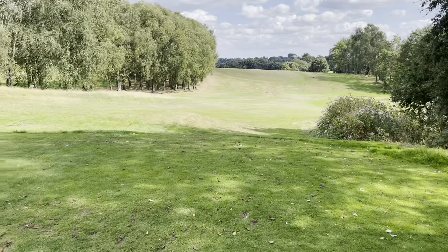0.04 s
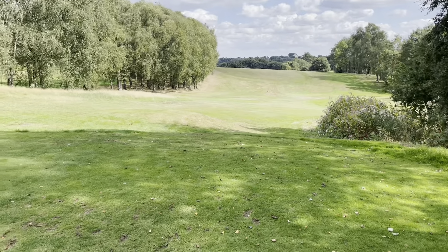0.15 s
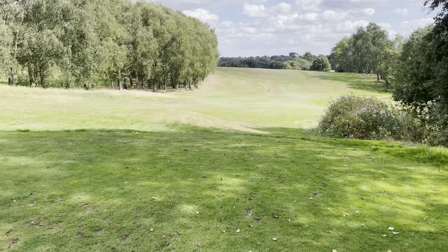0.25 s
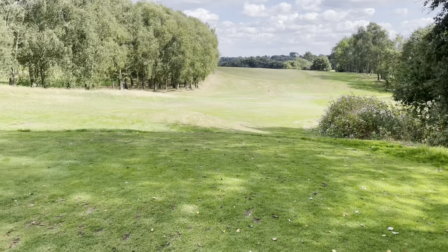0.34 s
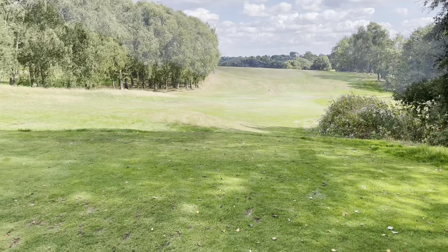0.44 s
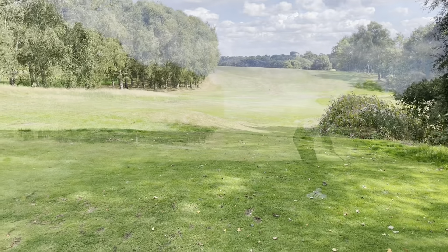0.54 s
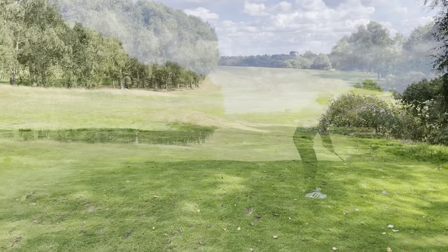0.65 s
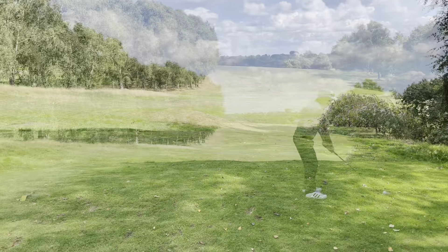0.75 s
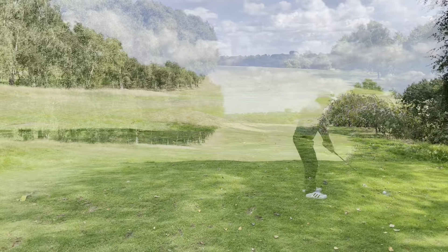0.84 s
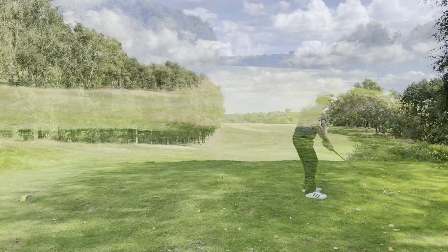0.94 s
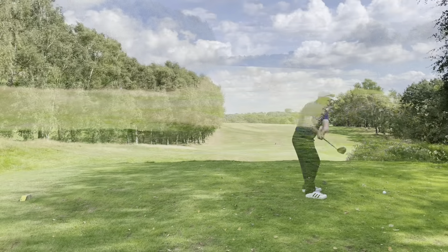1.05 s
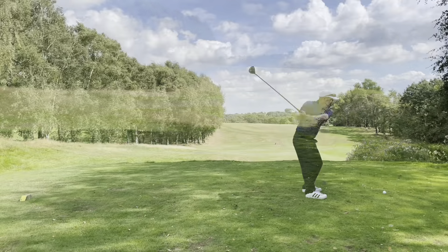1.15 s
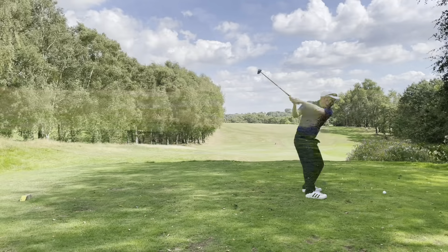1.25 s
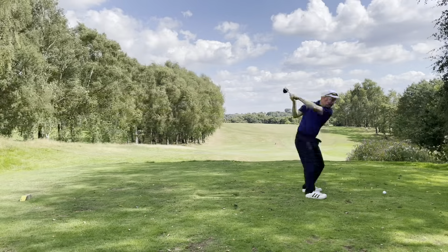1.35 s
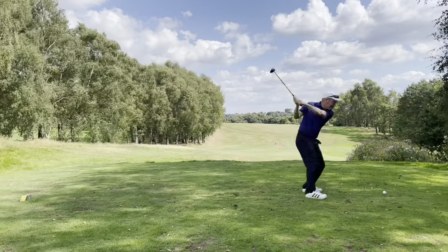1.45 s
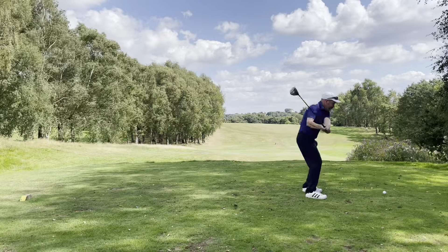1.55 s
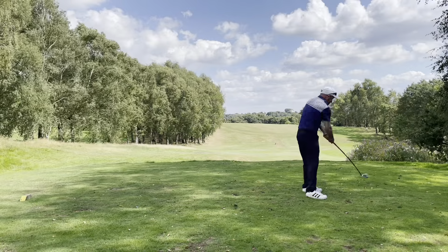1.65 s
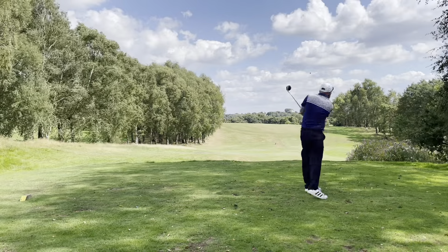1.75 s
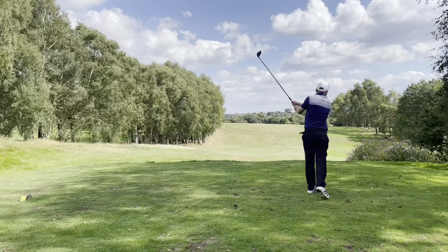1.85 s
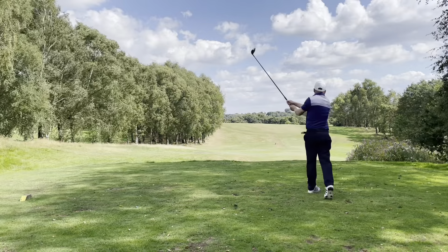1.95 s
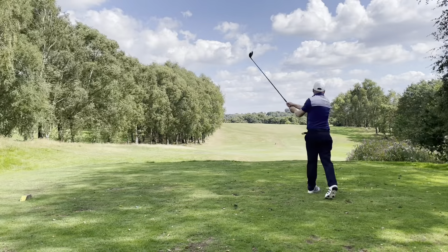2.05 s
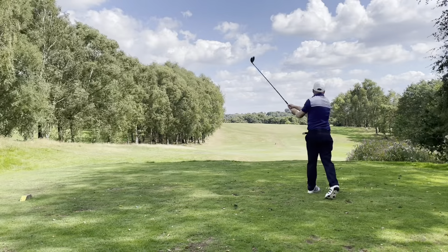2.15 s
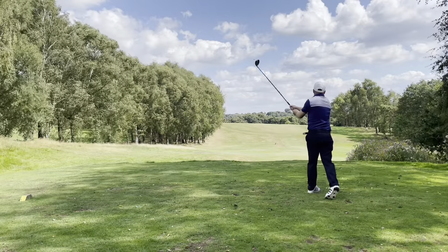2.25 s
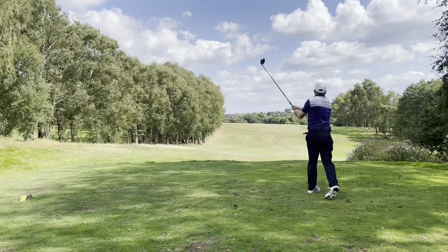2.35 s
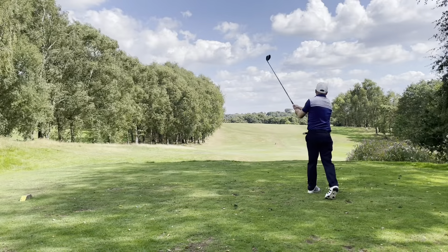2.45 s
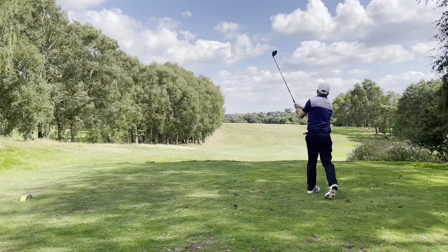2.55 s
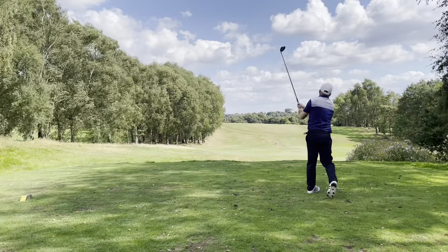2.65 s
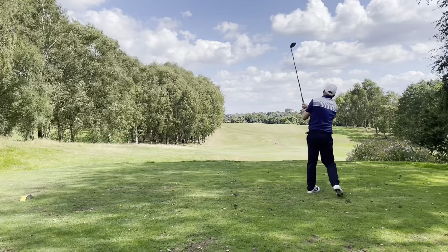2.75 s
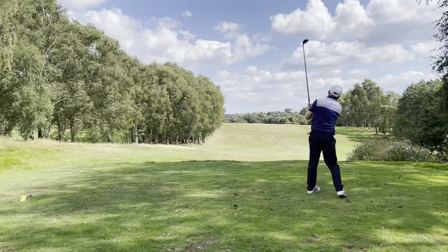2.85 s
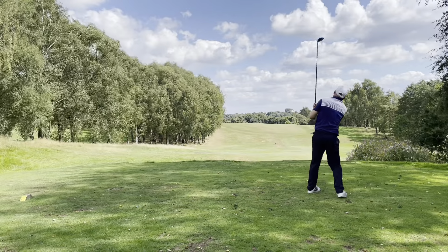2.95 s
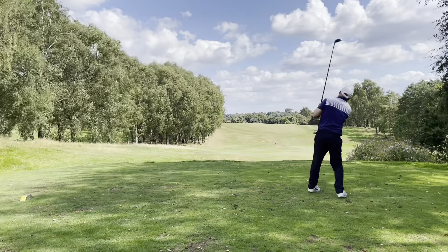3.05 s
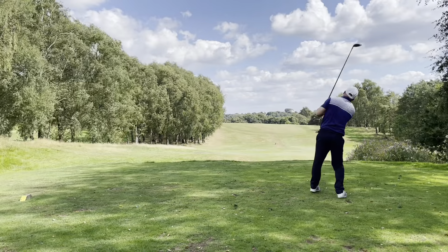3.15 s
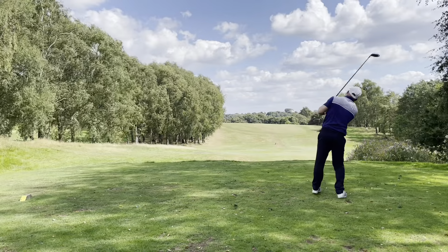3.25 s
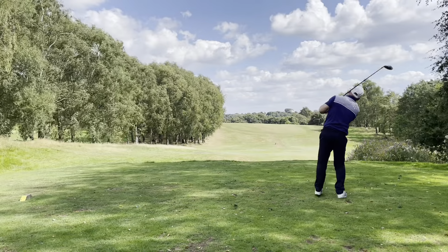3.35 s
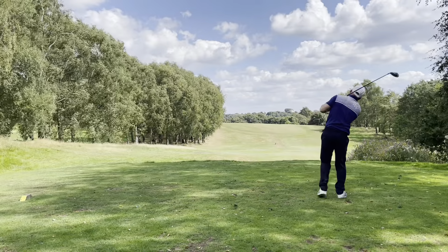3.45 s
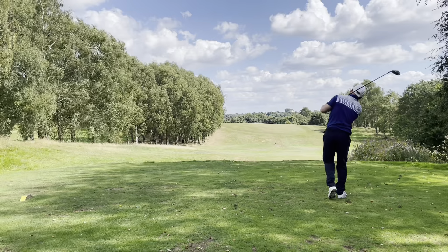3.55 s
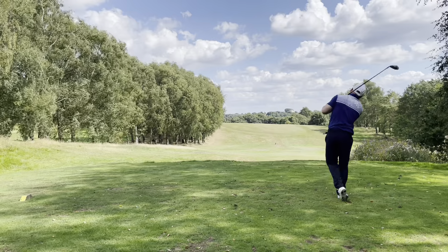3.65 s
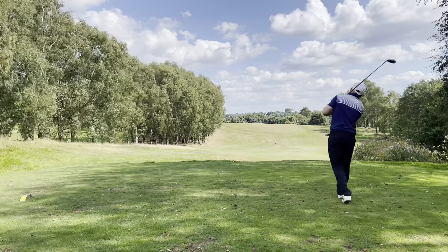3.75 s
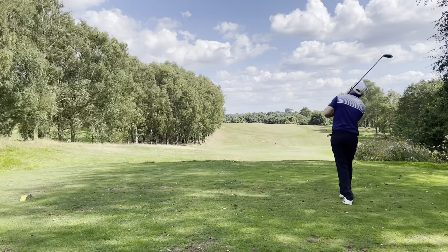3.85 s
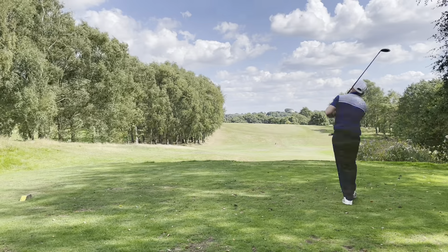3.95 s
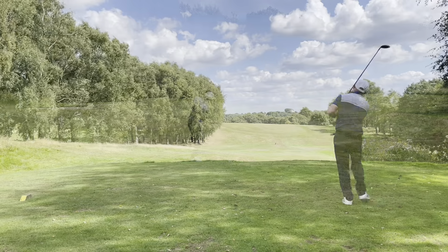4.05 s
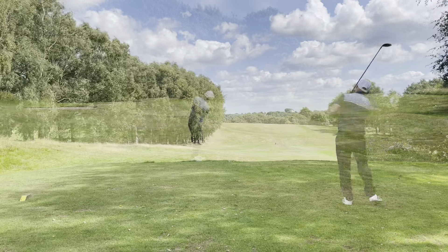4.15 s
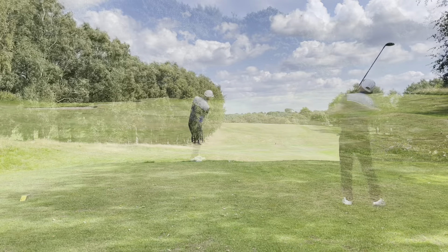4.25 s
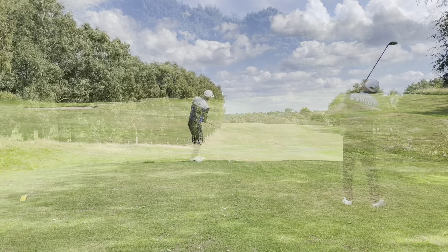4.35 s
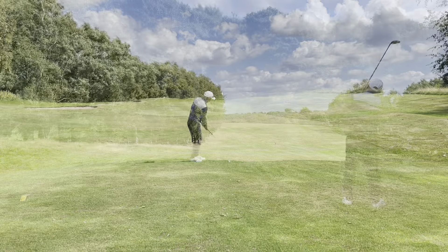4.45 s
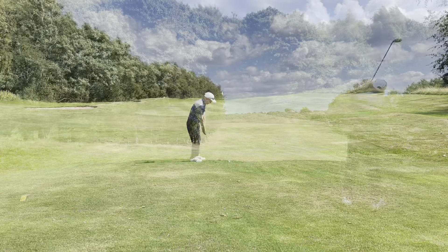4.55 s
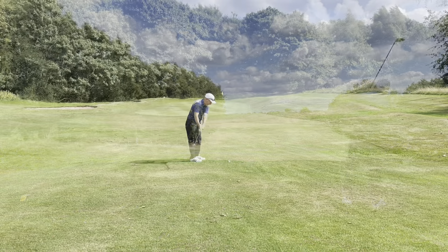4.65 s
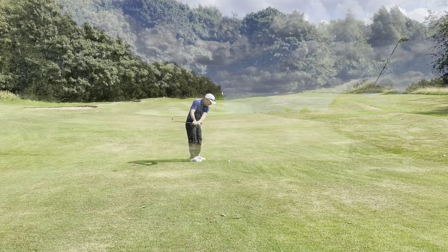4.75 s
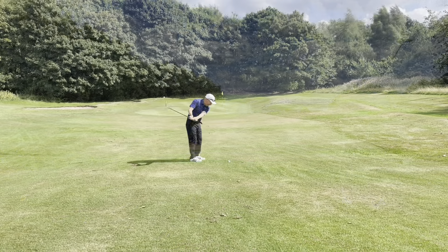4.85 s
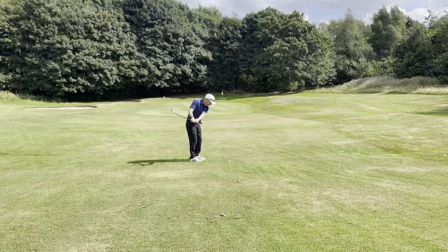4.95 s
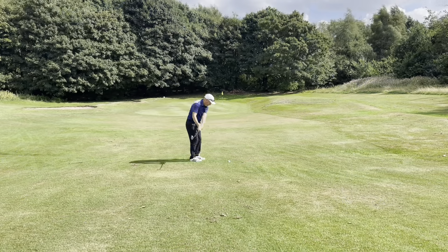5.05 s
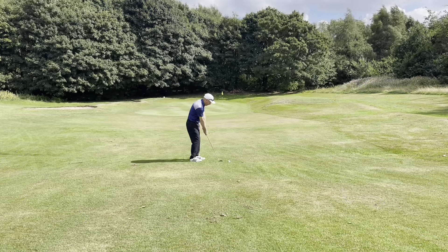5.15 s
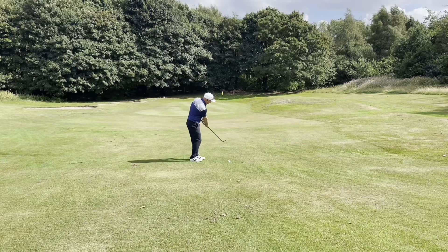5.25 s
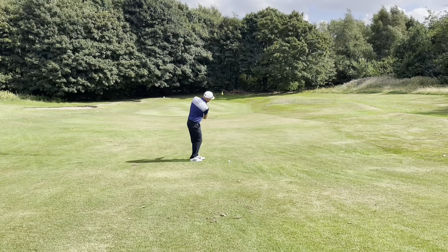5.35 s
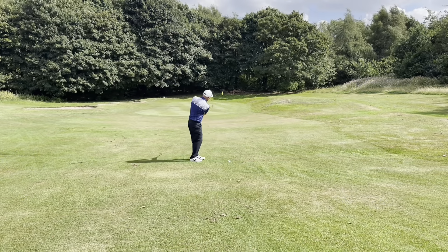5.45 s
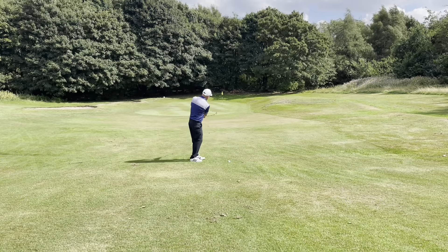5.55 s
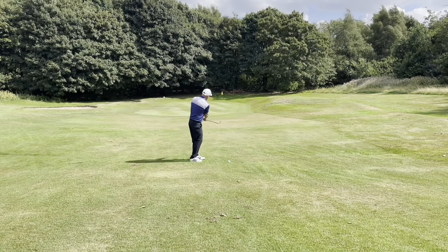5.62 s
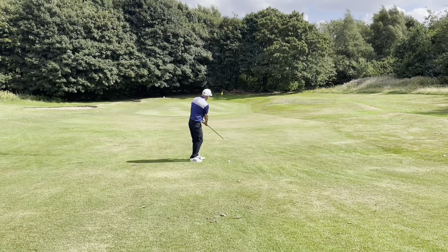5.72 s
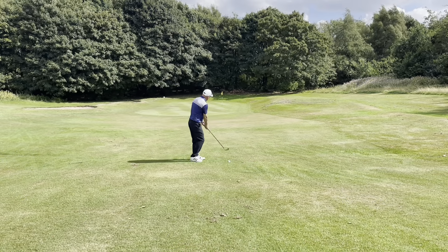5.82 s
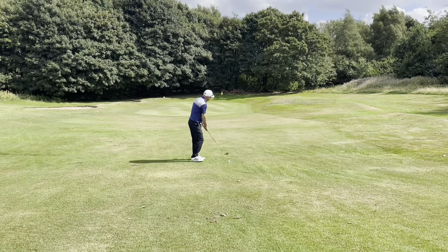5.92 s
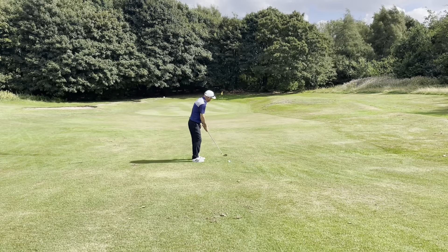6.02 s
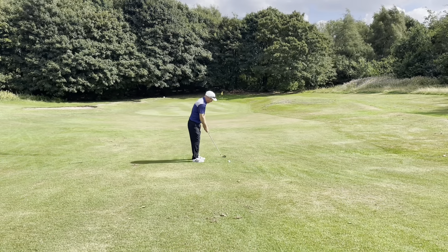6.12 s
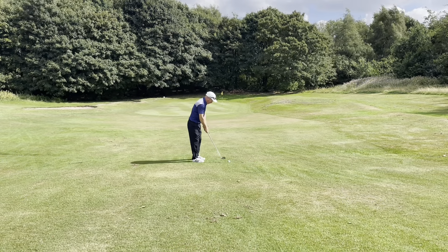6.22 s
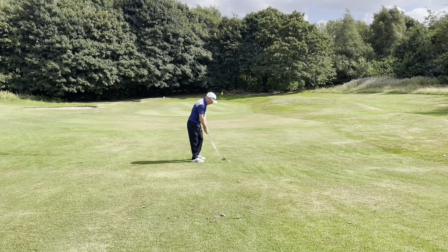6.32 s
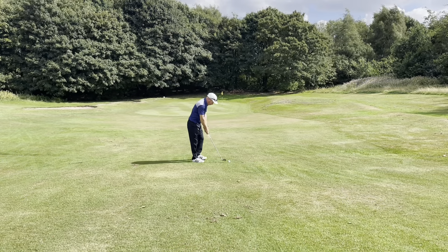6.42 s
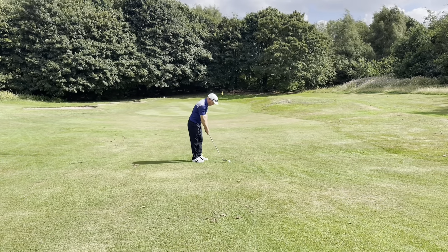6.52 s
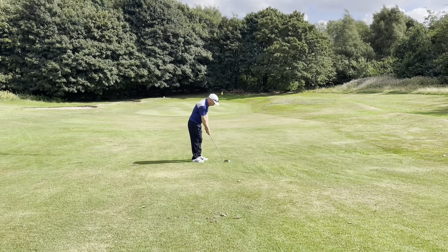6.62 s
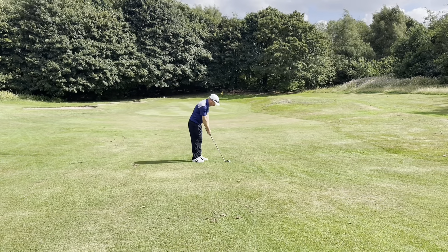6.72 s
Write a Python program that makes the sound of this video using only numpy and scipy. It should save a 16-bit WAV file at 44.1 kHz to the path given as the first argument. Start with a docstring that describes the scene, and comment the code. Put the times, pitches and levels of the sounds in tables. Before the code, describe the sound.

A sharp, pinging golf drive outdoors, followed by growing wind thumps on the microphone and a soft, distant club brushing grass.

```python
"""A driver cracks a golf ball off the tee: the hollow head rings, and trees hissing in the breeze throw
the crack back. The air then fades to an open fairway, where gusts buffet the microphone and a distant
short iron brushes through the turf. Two close microphone ports colour the stereo picture, and gain
control ducks the background after the crack."""
import sys
import numpy as np
from scipy import signal
from scipy.fft import rfft, irfft
from scipy.io import wavfile
from scipy.ndimage import uniform_filter1d

SR = 44100
rng = np.random.default_rng(int(sys.argv[2]) if len(sys.argv) > 2 else 0)


def persist_wave(psi):
    """Save psi, clipped to +-1, as 16-bit WAV."""
    counts = np.round(np.clip(psi, -1, 1) * 32767).astype(np.int16)
    wavfile.write(sys.argv[1], SR, np.atleast_2d(counts).T)


N = 298998
BIN_HZ = np.fft.rfftfreq(N, 1 / SR) + 1   # 1 Hz up, to keep the log finite

# The far-off air. Each row: time in seconds, roar in dB, leaf hiss in dB, leaf treble shelf in dB.
AIR_LEVELS = [(0.0, -49, -59, 2), (0.7, -52, -61.5, 3.5), (1.27, -48, -54.5, 5.5), (2.15, -47.5, -55, 5.5),
              (3.74, -49.5, -56.5, 5.5), (4.25, -52, -60, 5), (4.7, -48, -56.5, -6), (5.2, -46.3, -56, -6),
              (6.78, -45.5, -55, -5.5)]
# Wind strength on the ports. Each row: time in seconds, rumble in dB, flutter in dB.
WIND_LEVELS = [(0.0, -47, -66), (0.4, -46.5, -61), (0.7, -53, -66), (1.2, -48, -61), (1.9, -49.5, -61.5),
               (2.5, -48.5, -61), (3.4, -49.5, -61), (4.1, -47.5, -58), (4.38, -50, -60),
               (4.65, -42.5, -52.5), (4.92, -43, -56), (5.15, -38, -41.5), (5.3, -38.5, -46),
               (5.48, -33, -37.5), (5.65, -38, -48.5), (5.8, -37.5, -45), (5.96, -36, -41),
               (6.25, -35, -40.5), (6.45, -33.5, -40), (6.55, -35, -44.5), (6.7, -33, -43),
               (6.78, -40, -62)]
# How alike the two ports feel the wind. Each row: frequency in Hz, likeness from 0 to 1.
WIND_LIKENESS = [(30, 0.7), (80, 0.99), (200, 0.6), (400, 0.5), (800, 0)]
# Wind hits, from slow lumps to quick slaps.
# Each row: centre in seconds, peak in dB, pitch in Hz, width in cycles, left over right in dB.
WIND_HITS = [(0.073, -31.5, 58.0, 0.91, -1), (0.128, -33.0, 85.0, 1, 0.0), (0.197, -31, 62.0, 1.3, -1.0),
             (0.317, -27.5, 73.0, 1.8, 0.0), (0.346, -34, 67.0, 1.4, 1.0), (0.543, -38.0, 362.0, 3.1, 0.0),
             (0.592, -35.5, 99.0, 1.3, -1), (1.826, -43.0, 67.6, 2.8, 1.0), (1.888, -38, 73.0, 2.8, 0.0),
             (2.042, -39, 85.0, 2.0, 0.0), (2.289, -42, 91.0, 2.0, 2), (2.634, -36.5, 74, 1.2, 1.0),
             (4.377, -38.5, 268, 1.7, 1), (4.459, -30.5, 197.0, 1.04, -1.0), (4.548, -37, 200, 1.1, 1),
             (4.6, -34.5, 200, 1.4, 0), (4.658, -35, 267.0, 3.6, 1), (4.682, -29.5, 212.0, 1.1, 1.0),
             (4.775, -36, 300, 1.5, 1), (4.827, -32.0, 156.0, 1.47, -0.5), (4.837, -31, 247.0, 1.2, 2.0),
             (4.96, -34.5, 572.0, 0.77, -3), (4.96, -30.0, 212.0, 2.1, -1.0),
             (4.981, -29, 197.0, 1.2, -1.0), (4.993, -31, 197.0, 1.0, -1.0), (5.05, -30, 229.0, 1.0, 0),
             (5.085, -30, 400, 2, 2), (5.105, -28, 301, 1.7, 0), (5.152, -29.5, 420, 1.4, 1),
             (5.185, -26.5, 417, 2.5, 1.0), (5.189, -22.5, 227, 1.1, -1.0), (5.19, -27.5, 92, 2.8, 2),
             (5.224, -25, 170, 1.5, 1), (5.295, -27.5, 150, 1.9, 1), (5.346, -25.5, 330, 1.34, 4),
             (5.365, -26, 58.0, 3.2, 5), (5.392, -19.5, 115.0, 1.6, -1), (5.403, -24, 73.0, 1.6, -2),
             (5.409, -21.5, 380.0, 2.2, -1.0), (5.421, -22, 182.0, 1.6, 0.0), (5.434, -28, 78.0, 2.8, 0.5),
             (5.468, -27.5, 530.0, 2.2, 2.0), (5.472, -22, 334, 0.93, 2), (5.489, -20, 267.0, 1.2, 2.0),
             (5.497, -25, 78.0, 3, 0), (5.504, -22, 336.0, 0.79, -1.0), (5.525, -26.5, 108, 1.7, 1.0),
             (5.552, -27.5, 336.0, 2.6, 2.0), (5.559, -20, 168, 1.0, -1), (5.577, -21.5, 73.0, 2.7, -1),
             (5.61, -24.5, 73.0, 0.99, 1.0), (5.615, -23, 330, 1.4, 0), (5.693, -22, 422.0, 0.97, 3.0),
             (5.728, -24.5, 91.0, 1.4, 6), (5.735, -25.0, 667.0, 1.0, 1), (5.737, -21.0, 393, 2.1, -2),
             (5.749, -21.5, 98.5, 1.3, -1.0), (5.8, -30.5, 460, 1.4, 0), (5.866, -24, 92, 1.4, 2),
             (5.9, -30, 490, 1.6, 3), (5.934, -26.5, 375, 1.3, 1), (5.942, -26.5, 108, 2.9, 0.0),
             (5.948, -25, 186, 2.6, 0.0), (5.975, -21, 134.0, 1.3, -1.0), (5.993, -30, 420, 1.6, -1),
             (6.042, -27, 340, 1.4, -0.5), (6.078, -23.5, 107.0, 2.1, 1), (6.111, -19.0, 420.0, 1.2, 0.0),
             (6.12, -21.5, 124.0, 2.0, 0.0), (6.155, -35, 330, 1.4, 0), (6.188, -28, 91.0, 2.5, 0.0),
             (6.193, -26, 380, 1.6, 2), (6.206, -22, 430.0, 1.3, 5), (6.214, -24, 85.0, 2.0, 2),
             (6.227, -24.5, 460.0, 2.5, 3.0), (6.242, -26, 450.0, 1.7, 2.0),
             (6.266, -22.5, 200.0, 0.89, 0.0), (6.287, -21, 500.0, 1.05, 6), (6.288, -24.5, 67.0, 3.2, 1.0),
             (6.292, -21.0, 229.0, 0.76, 1.0), (6.355, -23.0, 91.0, 2.8, 0.0),
             (6.4, -23.5, 336.0, 1.1, -1.5), (6.418, -21, 362.0, 2.1, 1), (6.426, -20.5, 156.0, 1.9, 0.5),
             (6.446, -18, 269, 0.96, 0), (6.452, -24.5, 66.5, 2.8, 2), (6.458, -21, 470.0, 1.1, 8),
             (6.478, -29, 400, 1.4, 2), (6.487, -25.0, 91.0, 1.4, -3), (6.588, -25.5, 667.0, 2.2, 2),
             (6.615, -27, 62.0, 2.4, 0.0), (6.616, -20.0, 99.0, 1.3, 0.5), (6.658, -19.5, 460.0, 1.7, 5),
             (6.671, -28, 91.5, 2.8, -1), (6.69, -33, 330, 1.4, -2), (6.711, -21.5, 72.4, 2.8, -2.0),
             (6.72, -22.5, 229.0, 0.95, 1)]


def drive():
    """The head swishes through the air and crushes the ball with a crack, a ring and low pushes."""
    # Air and impact spectra. Each row: frequency in Hz, relative level in dB.
    swish_colour = [(120, -50), (250, -4), (400, -1), (800, -2), (1200, -12), (3000, -27), (9000, -36.5),
                    (14000, -70)]
    crack_colour = [(500, -30), (1100, 1), (3000, -6), (6000, 2), (12000, -3.5), (15500, -12.5),
                    (16500, -30.5)]
    # Their envelopes. Each row: peak time in seconds, level in dB, then rise, hold and fall in seconds.
    swish = [(1.57, -44.5, 0.3, .062, 0.092)]
    crack = [(1.6373, -21, 0.0068, .001, 0.0356)]
    # The sole over the turf and the ball springing off.
    # Each row: centre in seconds, peak in dB, pitch in Hz, width in cycles, left over right in dB.
    pushes = [(1.6346, -27.5, 765, 2, -0.5), (1.6404, -18, 370, 0.76, -4), (1.647, -27, 235, 1.5, 0.5)]
    out = head_ring()
    for push in pushes:
        add_pulse(out, *push, phase=-2.4)
    return out + bursts(swish_colour, swish) + bursts(crack_colour, crack)


def head_ring(strike_s=1.6363, strike_db=-12):
    """The hollow club head rings in its modes: a hard, brief ping, then a faint lingering tone."""
    # Head modes. Each row: pitch in Hz, relative level in dB, t60 in seconds,
    # left over right in dB, right phase lead in radians.
    modes = [(1464, -16, .05, 0, .6), (1889, -13, .05, -2, .6), (2594, -24, .04, 3, .4),
             (4032, -21, .04, 8, .1), (4602, -11, .04, 10, -.7), (4880, -13, .01, 12, -.6),
             (5124, -19, .03, 17, -.6), (5380, -11, .01, 12, -1), (5717, -14, .04, 9, -1.3),
             (6056, -10, .04, 9, -1.6), (6165, -13, .05, 4, -2), (6513, -16, .05, -2, -2),
             (6675, -19, .05, -1, -2.9), (7197, 1, .08, -2, -2.8), (7590, -7, .06, -1, -2.7),
             (7832, -18, .06, -1, -2.7), (8403, -7, .06, 0, -2.3), (8941, -16, .04, -1, -1.9),
             (9388, -16, .04, 0, -1.3), (9960, -12.5, .025, 1, -.8), (10780, -15, .02, -1, 0),
             (11550, -2, .006, 0, .5), (12155, 2, .008, 0, 1), (15557, -17, .03, 1, -2.2)]
    # The ping holds, then drops sharply. Each row: seconds after contact, gain in dB.
    ping_shape = [(0, -7), (.0004, 3), (.004, 1), (.005, -4), (.0065, -10.5), (.0075, -21.5), (.012, -44)]
    # The ring that stays. Each row: frequency in Hz, level against the mode in dB, t60 in seconds.
    linger = [(1500, -22, .05), (4000, -25, .06), (4700, -14, .05), (5200, -8, 0.22), (5400, -16.5, .1),
              (6100, -13, 0.06), (7200, -27.5, .15), (7900, -12.5, .25), (8550, -26.5, .15),
              (12000, -36.5, .08)]
    linger_hz, linger_db, linger_t60 = np.transpose(linger)
    t = np.arange(round(.3 * SR)) / SR
    at = round(strike_s * SR)
    ping = from_db(np.interp(t, *np.transpose(ping_shape)))
    out = np.zeros((2, N))
    for k, (hz, db, t60, pan_db, lead) in enumerate(modes):
        tail_db = np.interp(hz, linger_hz, linger_db) - 60 * t / np.interp(hz, linger_hz, linger_t60)
        envelope = ping * from_db(-60 * t / t60) + from_db(tail_db) * np.minimum(t / .001, 1)
        tone = np.sin(2 * np.pi * hz * t - opposed(lead / 2)) * (-1) ** k
        out[:, at:at + len(t)] += from_db(strike_db + db + opposed(pan_db / 2)) * envelope * tone
    return out


def echoes():
    """The crack scatters off grass and near trees, and comes back duller off the ground and far trees."""
    # The returns. Each row: peak time in seconds, level in dB, then rise, hold and fall in seconds.
    near = [(1.641, -27, .008, 0.00087, .05), (1.665, -43, .05, 0.009, .2), (1.69, -39, .1, .01, 0.14)]
    far = [(1.6445, -33.5, .004, .004, 0.022), (1.657, -42, .02, .003, .05), (1.73, -51, .15, 0.037, 0.3),
           (1.79, -57, .15, .03, 0.34)]
    # Their spectra. Each row: frequency in Hz, relative level in dB.
    near_colour = [(700, -69.5), (1500, -12), (3000, -16), (4300, -6.5), (5150, -6), (6000, -4), (7000, -3),
                   (7800, 1.5), (8700, -7.5), (12000, -14), (13600, -14.5), (14500, -32), (15300, -60.5)]
    far_colour = [(700, -69), (1500, -12), (3000, -12.5), (4300, -4.5), (5200, 0), (6200, -3), (7500, -5.5),
                  (9200, -7.5), (12000, -22), (14000, -40), (16500, -70)]
    return bursts(near_colour, near) + bursts(far_colour, far)


def iron():
    """The distant short shot: a soft rush near 1 kHz, then the sole scuffing the grass."""
    # Rush and scuff. Each row: peak time in seconds, level in dB, then rise, hold and fall in seconds.
    rush = [(4.88, -47.5, 0.43, .005, 0.33)]
    scuff = [(5.157, -59, .01, .004, .05), (5.165, -53.5, .03, .005, .08)]
    # Their spectra. Each row: frequency in Hz, relative level in dB.
    rush_colour = [(400, -49.5), (750, -5), (1000, -1), (1300, -4.5), (2500, -47), (8000, -110)]
    scuff_colour = [(700, -64), (1500, -12), (3000, 5), (5000, -4), (6500, -1.5), (8000, -2), (12000, -6),
                    (14300, -6.5), (15700, -3), (16500, -26)]
    return bursts(rush_colour, rush) + bursts(scuff_colour, scuff)


def wind_rumble():
    """Wind on the ports makes a lumpy rumble; stronger gusts add smaller, quicker eddies."""
    # Rumble and gust spectra. Each row: frequency in Hz, relative level in dB.
    rumble_colour = [(12, -68), (25, -28), (32, -21), (42, 2.5), (55, 10.5), (80, 10.5), (110, 6.5),
                     (150, -1.5), (220, -27.5), (500, -80), (4000, -140)]
    gust_colour = [(25, -40), (48, 1), (75, -3.5), (110, 1.5), (160, 2), (230, -7), (330, -14), (900, -71),
                   (4000, -140)]
    rumble_db, _ = in_time(WIND_LEVELS)
    likeness = at_hz(WIND_LIKENESS)[0]
    rumble = noise(rumble_colour, likeness)
    lump_size = np.sqrt(uniform_filter1d((rumble ** 2).mean(axis=0), size=1400) + .02)
    lumps = rms_one(rumble / lump_size ** 0.64)   # more even in size than plain noise
    lumps *= from_db(rumble_db + 1.06 * drift(6.0))
    gust_db = -38 + 1.55 * (rumble_db + 34.5)   # grows faster than the rumble
    return lumps + noise(gust_colour, likeness) * from_db(gust_db)


def wind_flutter():
    """Turbulence on the ports comes in quick bursts and flares after each slap."""
    # Flutter spectrum. Each row: frequency in Hz, relative level in dB.
    colour = [(40, -63), (90, -14), (150, 3), (250, -0.5), (400, -5.5), (600, -12.5), (900, -18),
              (1500, -59.5), (3000, -90.5), (8000, -140)]
    _, flutter_db = in_time(WIND_LEVELS)
    envelope = from_db(flutter_db + 3 * drift(22)) + wakes()
    turbulence = noise(colour, at_hz(WIND_LIKENESS)[0]) + from_db(-3.5) * eddies()
    return turbulence * envelope


def wakes(slap_above_hz=300, t60_s=0.11, rise_s=0.0026):
    """The envelope of the flutter that each quick slap leaves behind it."""
    kicks = np.full(N, 1e-18)
    for s, db, hz, _, _ in WIND_HITS:
        kicks[round(s * SR)] += from_db(db - 18) * (hz > slap_above_hz)
    decays = signal.lfilter([1], [1, -from_db(-60 / (t60_s * SR))], kicks)
    pole = np.exp(-1 / (rise_s * SR))
    return signal.lfilter([(1 - pole) ** 2], [1, -2 * pole, pole ** 2], decays)


def eddies(per_s=140.0, spread_db=2.0):
    """Small eddies strike at random, each a brief pitched swing; the ports feel them unequally."""
    strikes = (rng.random(N) < per_s / SR) * rng.choice([-1, 1], N)
    size_db = spread_db * np.minimum(rng.exponential(1, N), 4)
    strikes = strikes * from_db(size_db + rng.normal(0, 3.0, (2, N)))
    pitch_index = rng.integers(0, 6, N)
    out = np.zeros((2, N))
    for k, hz in enumerate(np.geomspace(200, 620, 6)):
        t = np.arange(-2 / hz, 2 / hz, 1 / SR)
        swing = np.exp(-2.2 * (t * hz) ** 2) * np.sin(2 * np.pi * hz * t) * from_db(-2.5 * k)
        out += signal.oaconvolve(strikes * (pitch_index == k), swing[None], "same")
    return rms_one(out)


def wind_buffets(top_hz=840, skew_rad=.52):
    """Single dull thumps of wind, each reaching the two ports out of step."""
    out = np.zeros((2, N))
    for hit in WIND_HITS:
        turn, skew = rng.uniform(-0.99, 1, 2)
        add_pulse(out, *hit, phase=np.pi * turn + opposed(skew_rad * skew))
    return signal.sosfiltfilt(signal.butter(3, top_hz, fs=SR, output="sos"), out + 1e-18)


def breeze():
    """Far-off air roars softly and sets the leaves hissing, with a slight shimmer and two rustles."""
    # Air and leaf spectra. Each row: frequency in Hz, relative level in dB.
    roar_colour = [(90, -29), (170, -4), (340, -2), (690, -4.5), (1030, -5), (1400, -9.5), (2000, -22),
                   (3500, -49.5), (7000, -89.5)]
    leaf_colour = [(400, -62), (900, -20), (1500, 3), (2600, 0), (3900, -2.5), (4600, -2.5), (5500, -2),
                   (7200, -8.5), (9000, -12.5), (11000, -19), (13000, -27.5), (14900, -31.5), (15200, -58),
                   (16500, -70)]
    # The leaves stir. Each row: peak time in seconds, level in dB, then rise, hold and fall in seconds.
    rustles = [(0.2, -66, .3, .03, .3), (2.815, -60, 0.1, 0.018, 0.5)]
    roar_db, hiss_db, treble_db = in_time(AIR_LEVELS)
    leaves = far_noise(leaf_colour)
    dull = signal.sosfilt(signal.butter(1, 4500, fs=SR, output="sos"), leaves)
    leaves = dull + from_db(treble_db) * (leaves - dull)
    roar = far_noise(roar_colour) * from_db(roar_db + 0.82 * drift(7.1))
    hiss = leaves * from_db(hiss_db + 0.52 * drift(14) + 0.39 * drift(2.5))
    return roar + hiss + bursts(leaf_colour, rustles)


def far_noise(colour):
    """Noise arriving through the air, with a step in level and phase between the two ports."""
    # Stereo image. Each row: frequency in Hz, likeness from 0 to 1, left over right in dB.
    port_image = [(170, 0.9, 2), (340, 0.6, 0.5), (682, 0.05, 3.5), (1400, 0.23, 1.5), (1890, 0.2, 0),
                  (2560, 0.57, 2), (3580, 0.4, 3), (4620, 0.35, 3.5), (5300, 0.3, -0.5), (6230, 0.38, 4.5),
                  (7030, 0.93, -1), (9070, 0.7, .5), (10720, 1, 0), (13600, 1, 0)]
    # Phase step. Each row: frequency in Hz, right lead in radians.
    port_lead = [(170, 0.1), (340, -.5), (690, -2.1), (1400, -2.8), (1900, -5.4), (2600, -6.6),
                 (3450, -7.5), (4500, -6.2), (5700, -6.2), (6500, -3.3), (7900, -2.7), (10000, -.7),
                 (11300, .1), (13000, 1.3), (13800, 3.14), (15000, 3.14), (15600, 4.3)]
    likeness, pan_db = at_hz(port_image)
    half_step = from_db(pan_db / 2) * np.exp(-.5j * at_hz(port_lead)[0])
    return noise(colour, likeness, np.array([half_step, 1 / half_step]))


def bursts(colour, rows):
    """Far noise that rises, holds and falls, straight in dB; rise and fall times span 60 dB."""
    t = np.arange(N) / SR
    envelope = np.zeros(N)
    for s, db, rise, hold, fall in rows:
        away = np.maximum((s - t) / rise, (t - s - hold) / fall)
        envelope += from_db(db - 60 * np.maximum(away, 0))
    return far_noise(colour) * envelope


def noise(colour, likeness, port_response=1):
    """Coloured stereo noise at rms 1; likeness sets the balance of mid and side."""
    mid, side = rfft(rng.standard_normal((2, N)))
    likeness = np.clip(likeness, 0, 1)
    pair = np.sqrt(1 + likeness) * mid + opposed(np.sqrt(1 - likeness) * side)
    return rms_one(irfft(pair * port_response * from_db(at_hz(colour)[0]), N))


def add_pulse(out, centre_s, db, hz, cycles, pan_db, phase):
    """Mix in a short swing of pressure under a bell-shaped envelope."""
    reach = round(2 * cycles / hz * SR)
    offsets = np.arange(-reach, reach)
    t = offsets / SR
    bell = np.exp(-2 * (t * hz / cycles * 1.42) ** 2)
    swing = from_db(db + opposed(pan_db / 2)) * bell * np.cos(2 * np.pi * hz * t + phase)
    at = round(centre_s * SR) + offsets
    inside = (at >= 0) & (at < N)
    out[:, at[inside]] += swing[:, inside]


def drift(rate_hz):
    """A slow random wander at rms 1."""
    hop = 20
    pole = np.exp(-2 * np.pi * rate_hz * hop / SR)
    slow = signal.lfilter([1], [1, -2 * pole, pole ** 2], rng.standard_normal(N // hop + 4002))[4000:]
    return np.interp(np.arange(N) / hop, np.arange(len(slow)), rms_one(slow))


def in_time(rows):
    """One value per sample for each column."""
    s, *columns = np.transpose(rows)
    return [np.interp(np.arange(N) / SR, s, c) for c in columns]


def at_hz(rows):
    """One value per spectral bin for each column."""
    hz, *columns = np.transpose(rows)
    return [np.interp(np.log(BIN_HZ), np.log(hz), c) for c in columns]


def opposed(x):
    """Plus on the left, minus on the right."""
    return x * np.array([[1], [-1]])


def from_db(db):
    """Gain of a level in dB."""
    return 10 ** (np.asarray(db) / 20)


def rms_one(x):
    """Scale to rms 1."""
    return x / np.sqrt(np.mean(x ** 2) + 1e-20)


def scene():
    """The drive, its echoes and the iron over a bed of breeze and microphone wind."""
    bed = breeze() + wind_rumble() + wind_flutter() + wind_buffets()
    return bed + drive() + echoes() + iron()


def record(dry):
    """Gain control ducks just after a loud peak and lets go slowly; peaks are rounded, the top is cut."""
    threshold_db, attack_s, release_db_per_s, cutoff_hz = -19.5, 0.018, 52, 16600
    level_db = 10 * np.log10(uniform_filter1d((dry ** 2).mean(axis=0), size=64) + 1e-12)
    duck_db = np.maximum(level_db - threshold_db, 0) * 0.59
    release_db = release_db_per_s * np.arange(N) / SR
    held_db = np.maximum(np.maximum.accumulate(duck_db + release_db) - release_db, 0)
    pole = np.exp(-1 / (attack_s * SR))
    ducked = dry * from_db(-signal.lfilter([1 - pole], [1, -pole], held_db))
    rounded = np.tanh(ducked / 0.91)
    return signal.sosfilt(signal.cheby2(20, 70, cutoff_hz, fs=SR, output="sos"), rounded)


dry = scene()
out = record(dry)
persist_wave(out)
```